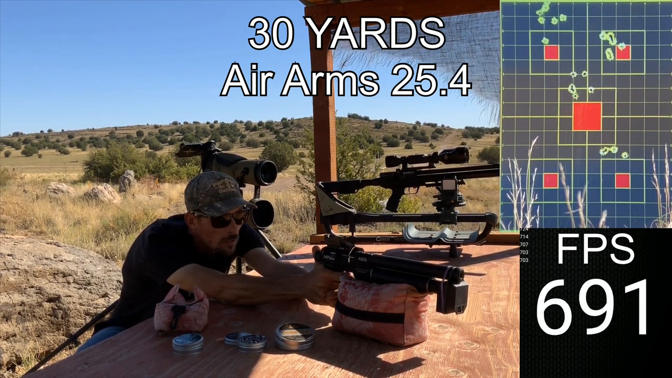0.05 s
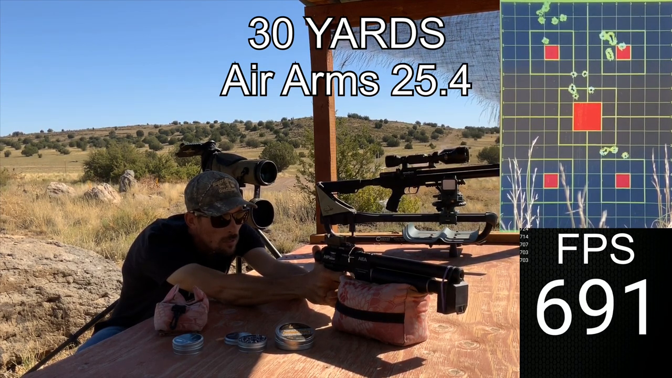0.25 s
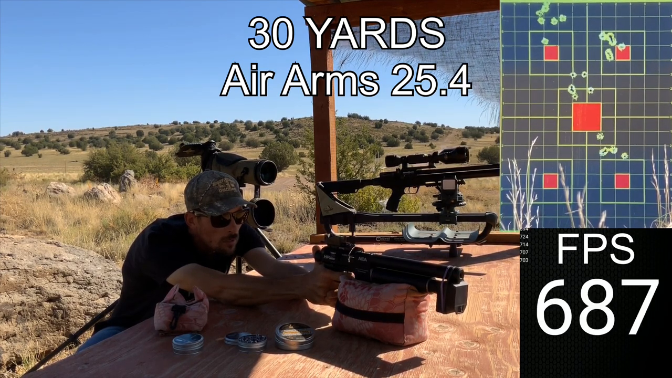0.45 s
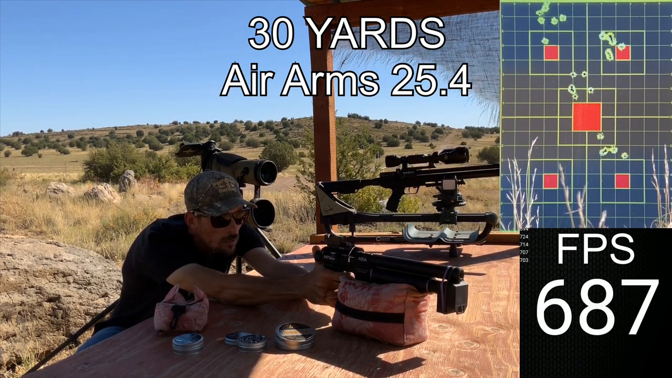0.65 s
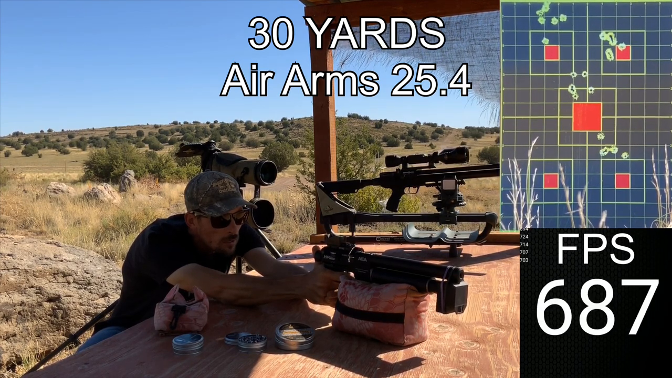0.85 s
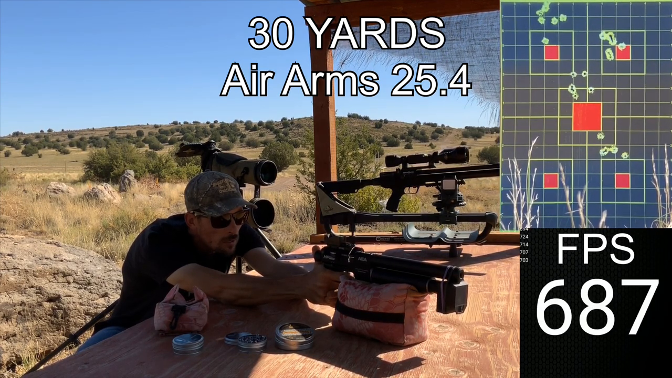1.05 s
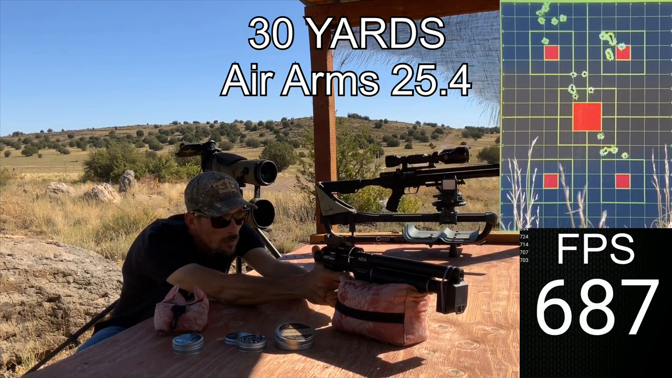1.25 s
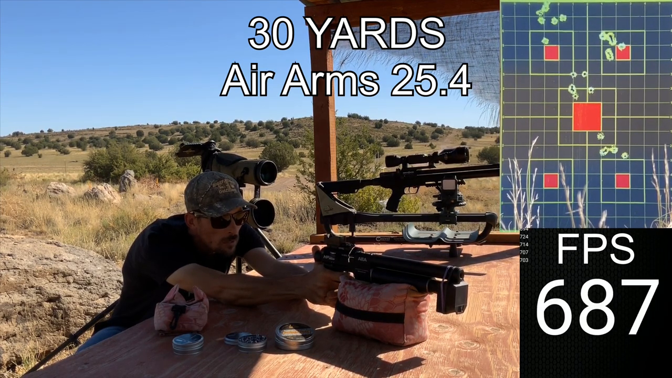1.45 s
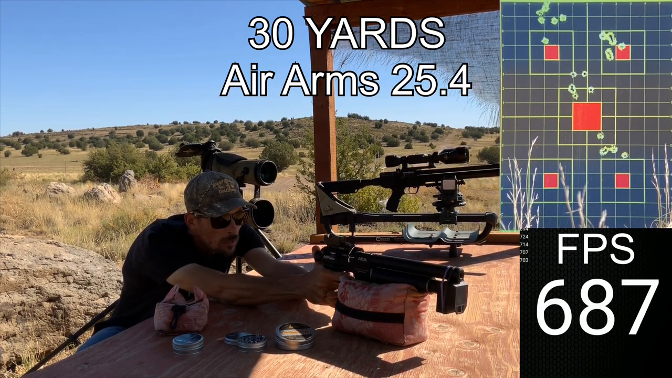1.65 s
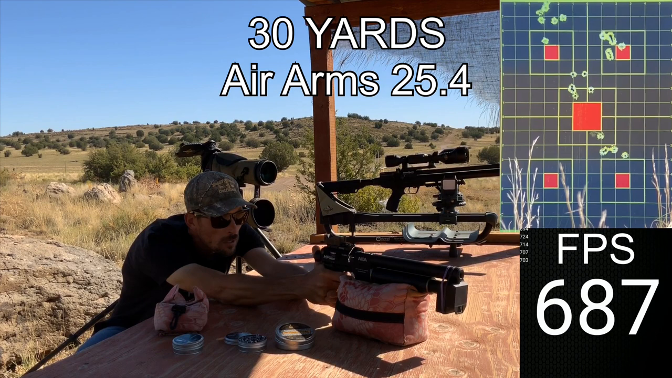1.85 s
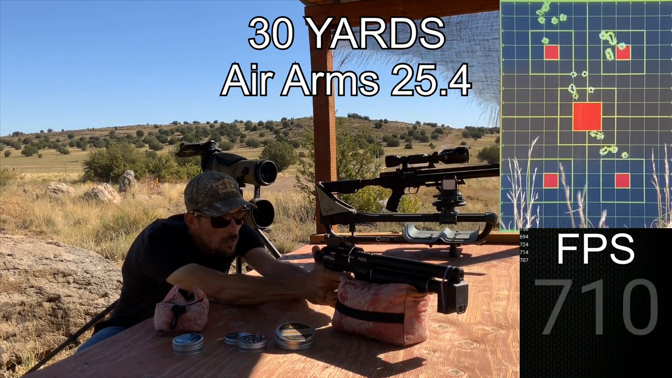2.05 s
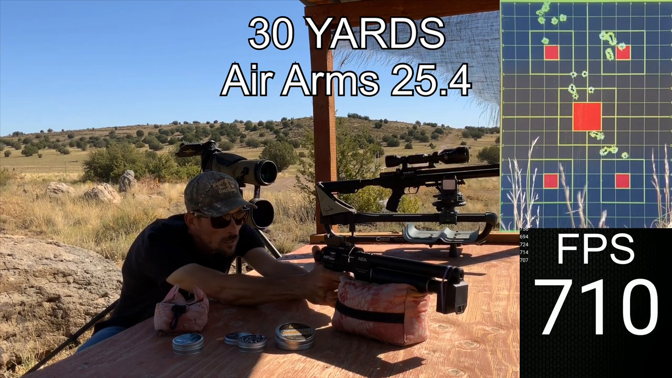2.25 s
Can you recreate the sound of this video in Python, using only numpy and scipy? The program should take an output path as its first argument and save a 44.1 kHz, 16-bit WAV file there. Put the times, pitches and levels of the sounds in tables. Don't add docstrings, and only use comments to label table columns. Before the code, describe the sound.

An air pistol fires twice at a wooden bench, pellets ringing a far steel target

```python
import sys
import numpy as np
from scipy import signal
from scipy.fft import rfft, irfft
from scipy.io import wavfile
from scipy.ndimage import uniform_filter1d

SR = 44100
rng = np.random.default_rng(int(sys.argv[2]) if len(sys.argv) > 2 else 0)


def master_out(mix):
    frames = np.transpose(np.atleast_2d(mix))
    ceiling = np.clip(frames, -1, 1)
    pcm = np.round(ceiling * 32767).astype(np.int16)
    wavfile.write(sys.argv[1], SR, pcm)


def invert_db(x):
    u = np.asarray(x, float) / 20
    return 10 ** u


N = 101430
T = np.arange(N) / SR
LEFT_RIGHT = np.array([[1], [-1]])


def curve(points, hz):
    p = np.array(points, float)
    return np.interp(np.log(hz + 1), np.log(p[:, 0]), p[:, 1])


def walk(rate):
    hold = int(SR / rate)
    steps = np.repeat(rng.standard_normal(N // hold + 1), hold)
    return 1.1 * uniform_filter1d(uniform_filter1d(steps, hold), hold)[:N]


# pitch_hz, level_db
WIDTH = [(60, -22), (125, -14), (250, -8), (500, -5), (1000, -6), (2000, -4), (4000, -12), (8000, -18),
         (14000, -19)]


def noise(tone, side_db=0.):
    hz = np.arange(N // 2 + 1) * SR / N
    octaves_outside = np.log2(np.maximum(np.maximum(tone[0][0] / (hz + 1), hz / tone[-1][0]), 1))
    db = curve(tone, hz) - 18 * octaves_outside
    mid, side = rfft(rng.standard_normal((2, N))) * invert_db(db)
    side = side * invert_db(curve(WIDTH, hz) + side_db)
    x = irfft(np.array([mid + side, mid - side]), N)
    return x / x.std()


def shape(stages, at=0., db=0.):
    out = np.zeros(N)
    for delay, rise, hold, t60, level_db in stages:
        t = T - at - delay
        release_db = 60 * np.maximum(t - rise - hold, 0) / t60
        out += np.clip(t / abs(rise), 0, 1) ** 2 * invert_db(level_db + db - release_db)
    return out


# start_s, level_db at the gun, level_db at the trap
SHOTS = [
    (0.198, 1.5, 3.5),
    (1.7531, 2, 4),
]
LATE = (.0023, 0)
AT_GUN, AT_TRAP = 1, 2


def burst(stages, tone, column, grain_db=0.5, side_db=0., late=LATE):
    envelope = sum(shape(stages, s[0] + d, s[column]) for s, d in zip(SHOTS, late))
    return envelope * invert_db(grain_db * walk(600)) * noise(tone, side_db)


def strike(stages, column):
    force = shape(stages) * rng.standard_normal(N)
    out = np.zeros(N)
    for shot, late in zip(SHOTS, LATE):
        start = int((shot[0] + late) * SR)
        out += invert_db(shot[column]) * np.pad(force, (start, 0))[:N]
    return out


def ring(force, modes, pan=0.):
    out = np.zeros((2, N))
    for (hz, db, t60), lean in zip(modes, rng.uniform(-0.26, 1, len(modes))):
        pole = np.exp(2j * np.pi * hz / SR - np.log(1000) / (t60 * SR))
        mode = signal.lfilter([1], [1, -pole], force).imag
        out += invert_db(db) * mode / abs(mode).max() * (1 + pan * lean * LEFT_RIGHT)
    return out


def ticks(rows, t60, wide=1.12):
    out = 0
    for s, db, hz in rows:
        x = shape([(s - .0004, .0004, .0004, t60, db)]) * rng.standard_normal((2, N))
        band = signal.butter(2, [hz / wide, hz * wide], "band", fs=SR, output="sos")
        x = signal.sosfilt(band, x) * np.sqrt(SR / hz * 2)
        out = out + x[0] + .15 * x[1] * LEFT_RIGHT
    return out


def thumps(rows, at=0.):
    out = 0
    for (s, hz, hold, t60, db), lean in zip(rows, rng.uniform(-1, 1, len(rows))):
        envelope = shape([(s, .6 / hz, hold, t60, db)], at)
        swing = envelope * np.sin(-2 * np.pi * hz * (T - at - s))
        out = out + swing * (1 + .2 * lean * LEFT_RIGHT)
    return out


# delay_s, rise_s, hold_s, t60_s, level_db
SEAR = [
    (-.016, .006, 0.0011, 0.032, -48.5),
    (-.006, 0.00417, .002, 0.017, -32.5),
]
# delay_s, rise_s, hold_s, t60_s, level_db
JET = [
    (-.001, 0.007, 0.0089, 0.043, -12.5),
    (0.015, 0.00092, 0.004, 0.14, -21),
]
# pitch_hz, level_db
JET_TONE = [(240, -53), (400, -22), (893, -3), (1040, -6), (1730, -6), (2400, -14.5), (2630, -8.5),
            (6440, -1), (16000, -33.5)]


def air_jet():
    return burst(SEAR + JET, JET_TONE, AT_GUN, side_db=-20.5, late=(0, 0))


# delay_s, rise_s, hold_s, t60_s, level_db
BOLT_BACK = [
    (.0436, .0004, .003, .025, -16),
    (.048, .001, .002, .05, -23),
]
# delay_s, rise_s, hold_s, t60_s, level_db
BOLT_HOME = [
    (0.0545, .002, 0.0047, 0.043, -19.5),
    (0.058, .0005, .002, 0.038, -25.5),
    (.064, 0.0015, 0.0079, 0.12, -28.5),
]
# pitch_hz, level_db
BACK_TONE = [(240, -23), (400, 4), (3020, -6), (4050, -6.5), (4510, -7), (5780, -0.5), (7170, -11),
             (12100, -17), (16000, -24)]
HOME_TONE = [(240, -13.5), (400, -2.5), (616, -4.5), (1710, -1), (2840, -19.5), (5110, -10.5),
             (7870, -14.5), (10900, -4), (16000, -22)]
# start_s, level_db, pitch_hz
CLACKS = [(.1905, -37, 6510), (1.7973, -22, 3300), (1.8175, -17, 1625), (.2445, -19, 5490),
          (.2458, -17, 11880), (.2465, -21.5, 6000), (.2487, -17, 6030), (.2556, -13, 9200),
          (.2570, -19.5, 4997), (.2580, -11.5, 10890), (.2597, -16, 11000), (.2625, -22, 8450),
          (.2665, -24.5, 11380), (1.7975, -14, 5000), (1.7989, -15, 6270), (1.7992, -20, 11700),
          (1.8022, -19.5, 5100), (1.8095, -29, 5410), (1.8112, -10.5, 10730), (1.8130, -9, 11100),
          (1.8165, -16, 8600), (1.8195, -19.5, 11400), (1.8228, -25.5, 11100), (1.8555, -30.5, 10540)]


def bolt():
    back = burst(BOLT_BACK, BACK_TONE, AT_GUN, grain_db=5.5, side_db=6.5)
    home = burst(BOLT_HOME, HOME_TONE, AT_GUN, grain_db=-3.5, side_db=-9.5)
    return back + home + ticks(CLACKS, t60=0.0039)


# pitch_hz, level_db, t60_s
GUN_MODES = [(926, 3.5, .04), (1641, -5, .04), (2618, -9.5, .03), (4545, -3, .025), (5170, -1.5, .045),
             (5730, -1.5, .03), (6660, -3, .03)]


def gun_metal():
    return invert_db(-21) * ring(strike(JET + BOLT_BACK + BOLT_HOME, AT_GUN), GUN_MODES)


# delay_s, rise_s, hold_s, t60_s, level_db
BOARDS = [
    (.005, 0.019, 0.041, 0.081, -25.5),
    (.06, 0.011, 0.014, 1, -37.5),
]
# pitch_hz, level_db
BOARDS_TONE = [(30, -14), (90, 0), (200, 6), (300, -9.5), (500, -21.5)]
# delay_s, pitch_hz, hold_s, t60_s, level_db
ROCKING = [
    (.019, 148.6, .024, 0.069, -16.5),
    (.025, 79.5, .05, 0.38, -35.5),
    (.0495, 182, .003, 0.06, -21),
    (.057, 312, 0.0028, 0.045, -15.5),
    (.066, 119, 0.019, 0.083, -17.5),
    (.105, 125, .013, .08, -28.5),
    (.138, 122, 0.025, 0.27, -29),
    (.198, 145.8, 0.018, 0.45, -39.5),
]
# start_s, pitch_hz, hold_s, t60_s, level_db
KNOCKS = [
    (2.0295, 209.4, 0.001, 0.059, -13),
    (2.040, 130.5, 0.025, 0.036, -26.5),
    (2.106, 121.2, 0.0037, 0.27, -28),
]
# start_s, rise_s, hold_s, t60_s, level_db
KNOCK_TAIL = [
    (2.035, 0.0036, 0.019, 0.45, -37.5),
]


def bench():
    boards = burst(BOARDS, BOARDS_TONE, AT_GUN, side_db=-9.5)
    rocking = sum(thumps(ROCKING, s[0]) for s in SHOTS)
    knock_tail = shape(KNOCK_TAIL) * noise([(250, 4.5), (800, 6.5), (1300, 2.0)])
    return boards + rocking + thumps(KNOCKS) + knock_tail


# delay_s, rise_s, hold_s, t60_s, level_db
TRAP_FIRST = [
    (.196, 0.014, 0.0075, 0.15, -46),
]
# delay_s, rise_s, hold_s, t60_s, level_db
TRAP_CRACK = [
    (.2398, .0002, .0004, 0.014, -23.5),
    (.244, 0.00056, 0.0051, 0.16, -28),
]
# delay_s, rise_s, hold_s, t60_s, level_db
TRAP_SPRAY = [
    (.258, 0.0026, 0.0077, 0.11, -38),
]
# delay_s, rise_s, hold_s, t60_s, level_db
TRAP_BODY = [
    (.245, 0.008, 0.0066, 0.13, -39),
    (.260, .003, 0.009, 0.095, -30),
    (.27, .02, .02, 0.55, -42),
]
# start_s, rise_s, hold_s, t60_s, level_db
OLD_TAIL = [
    (-0.075, 0.018, 0.027, 0.36, -62.5),
]
# pitch_hz, level_db
FIRST_TONE = [(700, -18), (1200, -8), (1600, -10), (1950, 4.5), (2200, -20), (4000, -27)]
CRACK_TONE = [(800, -10), (2000, 6), (4000, -14), (6200, 9.5), (8200, 9.5), (10000, -9), (15000, -22)]
SPRAY_TONE = [(4000, -21), (5200, 3), (7000, -8), (9500, -4.5), (11000, 8.5), (13000, -7.5), (16000, -12)]
BODY_TONE = [(350, -19.5), (700, -8.5), (1100, 1), (1600, -1), (2300, -9.5), (2800, -23.5), (5400, -17.5),
             (9000, -37)]


def trap():
    out = burst(TRAP_FIRST, FIRST_TONE, AT_TRAP, side_db=-17.5)
    out += burst(TRAP_CRACK, CRACK_TONE, AT_TRAP, side_db=12.5)
    out += burst(TRAP_SPRAY, SPRAY_TONE, AT_TRAP)
    out += burst(TRAP_BODY, BODY_TONE, AT_TRAP)
    return out + shape(OLD_TAIL) * noise(BODY_TONE)


# delay_s, rise_s, hold_s, t60_s, level_db
PLATE_HIT = [
    (.2, 0.0023, 0.0086, 0.036, -16),
    (.242, 0.006, 0.01, 0.084, -3.5),
    (.262, 0.00058, 0.0087, 0.017, -13.5),
]
# pitch_hz, level_db, t60_s
PLATE = [(737, -13, 0.66), (909, -26.5, .29), (973, -5, 0.28), (1157, -15, 0.52), (1365, -5, 0.17),
         (1451, -9.5, 0.082), (1404, -4.5, 0.35), (1915, -1, 0.081), (1960, 6, 0.22), (3015, -26.5, 0.71),
         (3770, -17.5, 0.33), (5000, -17, 0.24), (5200, -10, .15), (5604, -12, 0.23)]
LONG_HZ = (1567, 1620, 1669, 1863, 1869, 2144, 2304, 2342)
# level_db, t60_s
LONG_RING = [(-2, .4), (-2, .36), (-3, .4), (-15, .7), (-17, .7), (-20, 1.55), (-11, .45), (-14, .5)]


def trap_plate():
    modes = PLATE + [(hz, db, t60) for hz, (db, t60) in zip(LONG_HZ, LONG_RING)]
    return invert_db(-30 + 1.2 * walk(60)) * ring(strike(PLATE_HIT, AT_TRAP), modes, pan=0.9)


# delay_s, rise_s, hold_s, t60_s, level_db
SHELTER = [
    (.03, .03, 0.036, 0.97, -46.5),
]
# delay_s, rise_s, hold_s, t60_s, level_db
FIELD = [
    (.05, .04, 0.019, 0.58, -51.5),
    (.17, 0.07, 0.012, .3, -53),
]
# pitch_hz, level_db
SHELTER_TONE = [(300, -2.5), (630, -8), (1300, 6.5), (3000, -15.5), (5300, -8), (7500, -25.5), (11000, -17),
                (13500, -30)]
FIELD_TONE = [(1470, -34.5), (2500, -4.5), (4410, -8), (5230, -2.5), (8730, -5.5), (10900, -9.5),
              (14500, -20.5), (16000, -31.5)]


def echoes():
    roof = burst(SHELTER, SHELTER_TONE, AT_GUN, grain_db=-2.5, side_db=-2.5)
    return roof + burst(FIELD, FIELD_TONE, AT_GUN, grain_db=3.5)


# start_s, rise_s, hold_s, t60_s, level_db
RUSTLE = [
    (2.07, .04, 0.018, 0.33, -52),
]
# start_s, level_db, pitch_hz
RATTLES = [
    (1.976, -52, 5000),
    (2.125, -57, 6500),
    (2.160, -45, 5200),
    (2.162, -47, 3000),
    (2.199, -56, 5200),
    (2.224, -57, 6000),
]
# pitch_hz, level_db, t60_s
TIN = [(741, -35, 0.07), (910, -41.5, 0.17)]
# start_s, rise_s, hold_s, t60_s, level_db
TIN_HIT = [
    (2.052, 0.0083, 0.032, 0.07, 1),
    (2.092, .004, 0.042, 0.037, 0),
]


def pellet_tin():
    tone = [(3000, -19), (5300, 2), (7500, -7), (12000, -16.0)]
    rustle = shape(RUSTLE) * invert_db(2.3 * walk(190)) * noise(tone)
    buzz = ring(shape(TIN_HIT) * rng.standard_normal(N), TIN, pan=1.0)
    return rustle + ticks(RATTLES, t60=.012, wide=1.29) + buzz


# start_s, pitch_hz of the blades, level_db of multiples 1, 2 and 3
PROPELLER = [(0.72, 82.7, -61, -66, -69), (0.766, 82.56, -55.5, -67, -64.5), (0.848, 82.78, -54, -70, -57),
             (1.146, 82.22, -54, -58, -66.5), (1.254, 83.2, -54.5, -54, -65.5),
             (1.432, 82.82, -55.5, -50.5, -56), (1.644, 82.55, -75, -68.5, -69.5),
             (1.72, 83.07, -57, -63, -61)]


def aircraft():
    start_s, blade_hz, *levels_db = np.array(PROPELLER).T
    hz = np.interp(T, start_s, blade_hz) * (1 + 0.0026 * walk(6.1))
    phase = 2 * np.pi * np.cumsum(hz) / SR
    dbs = [np.interp(T, start_s, db) for db in levels_db]
    dbs += [-75 - 5 * k for k in range(4)]
    out = 0
    for k, db in enumerate(dbs):
        out = out + np.sqrt(2) * invert_db(db + 1.5 * walk(3)) * np.sin((k + 1) * phase + k)
    return out


# start_s, level_db
GRASS = [(.72, -73), (.97, -72), (1.0, -79), (1.03, -79), (1.05, -71), (1.1, -77), (1.17, -73), (1.28, -72),
         (1.31, -80), (1.44, -79), (1.47, -74), (1.52, -79), (1.63, -80), (1.66, -74)]
# pitch_hz, level_db
GRASS_TONE = [(1000, -5), (3000, 3.5), (9000, 0), (14000, -6), (15500, -14)]


def grass():
    breeze_db = np.interp(T, *np.array(GRASS).T)
    return invert_db(-2 + breeze_db + 3 * walk(170)) * noise(GRASS_TONE)


# pitch_hz, level_db
AIR_TONE = [(24, -41.5), (48, -24), (75, 4.5), (163, -1), (256, -14), (297, -18), (751, -26), (3000, -39),
            (16000, -55)]


def air():
    return invert_db(-53.5 + 1.5 * walk(14)) * noise(AIR_TONE, side_db=-4.5)


def recorder_tick():
    tick_hz, tick_s = 60, .0013
    cycles_off = (T * tick_hz - .3 + .5) % 1 - .5
    pulse = np.exp(-(cycles_off / tick_hz / tick_s) ** 2)
    return invert_db(-78) * pulse * noise([(9800, -19), (11000, -1), (12200, -21)], side_db=-9.5)


def scene():
    pistol = air_jet() + bolt() + gun_metal() + bench()
    target = trap() + trap_plate()
    background = aircraft() + grass() + air() + recorder_tick()
    return pistol + target + echoes() + pellet_tin() + background


def roll_off(x):
    return signal.sosfilt(signal.butter(12, 16830, fs=SR, output="sos"), x)


def record(dry):
    low_cut = signal.butter(3, 62, "high", fs=SR, output="sos")
    rounded = np.tanh(0.86 * signal.sosfilt(low_cut, dry)) / 0.96
    top_cut = signal.ellip(8, .3, 70, 16100, fs=SR, output="sos")
    return roll_off(signal.sosfilt(top_cut, rounded))


dry = scene()
out = record(dry)
master_out(out)
```